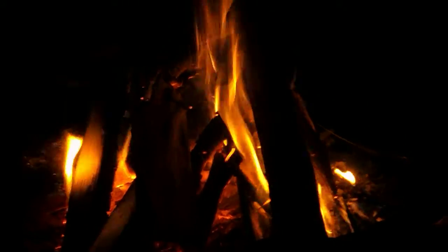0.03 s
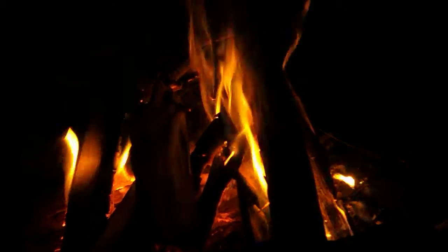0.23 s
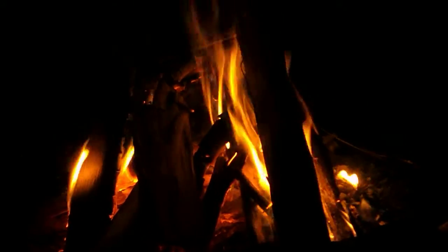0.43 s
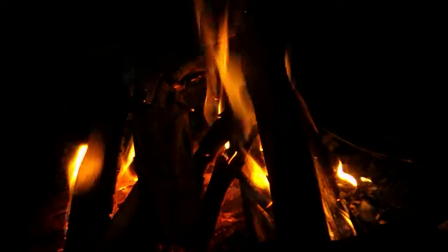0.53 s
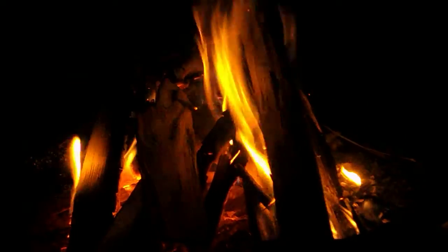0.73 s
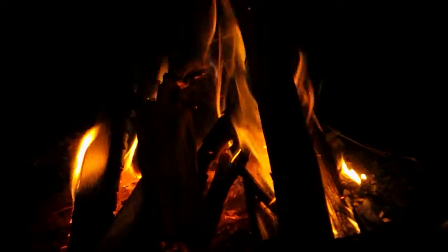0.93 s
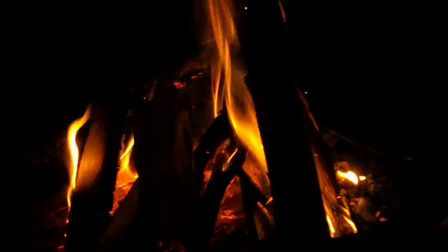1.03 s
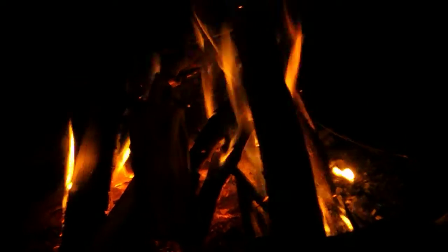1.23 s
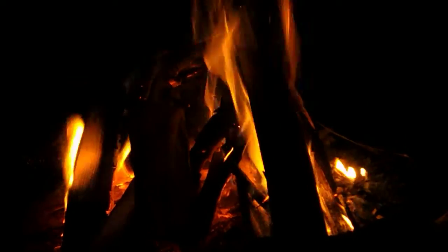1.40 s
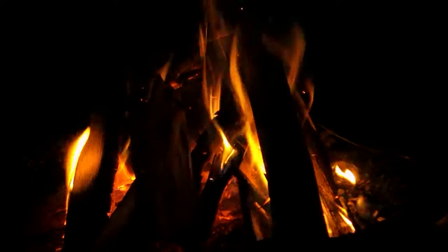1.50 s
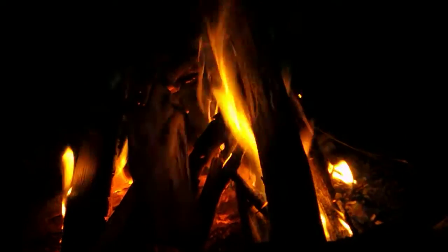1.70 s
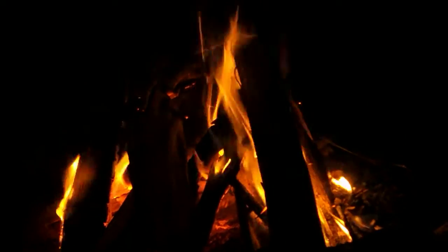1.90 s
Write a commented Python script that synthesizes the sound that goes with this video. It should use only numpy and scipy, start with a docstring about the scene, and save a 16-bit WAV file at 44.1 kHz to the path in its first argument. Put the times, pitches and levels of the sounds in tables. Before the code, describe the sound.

Wood fire crackling softly with one sharp snap, an owl hooting once far away.

```python
"""A campfire at night: from the start flames rush, steam hisses from the logs and embers tick
over a low, slowly beating hum. At 0.2 s a distant owl begins one long, wavering hoot that echoes
among the trees; just after, a log splits with a sharp snap. From 0.6 s sap whistles faintly, then
flaring gas puffs softly. The hoot ends in a tremolo by 1.4 s and the fire crackles on."""
import sys
import numpy as np
from scipy import signal
from scipy.fft import rfft, irfft
from scipy.io import wavfile
from scipy.ndimage import uniform_filter1d

SR = 44100
rng = np.random.default_rng(int(sys.argv[2]) if len(sys.argv) > 2 else 0)


def wrap_up_sound(samples):
    """Save the sound to the file named by the first command line argument, as 16-bit audio."""
    columns = np.atleast_2d(samples).T
    # keep every value between -1 and 1, then stretch to whole-number steps
    tamed = np.clip(columns, -1, 1)
    steps = np.round(tamed * 32767).astype(np.int16)
    wavfile.write(sys.argv[1], SR, steps)


N = 85995


def amp(db):
    """Decibels to gain."""
    return 10 ** (np.asarray(db) / 20)


def unit(x):
    """Scale to rms 1."""
    return x / np.sqrt(np.mean(x ** 2) + 1e-20)


def db_at(spectrum, hz):
    """Interpolate a spectrum on a log-frequency axis."""
    points_hz, db = np.transpose(spectrum)
    return np.interp(np.log(hz + 1), np.log(points_hz), db)


def add(mix, start_s, sound):
    """Mix a sound in at start_s."""
    part = mix[max(round(start_s * SR), 0):][:len(sound)]
    part += sound[:len(part)]


def drift(count, rate_hz):
    """Random wander below rate_hz, rms about 1."""
    hz = np.fft.rfftfreq(N, 1 / SR)
    lowpassed = rfft(rng.standard_normal(N)) / (1 + (hz / rate_hz) ** 4)
    return unit(irfft(lowpassed, N))[:count]


def click(colour, size=2048):
    """Minimum-phase click of energy 1; colour maps Hz to dB."""
    hz = abs(np.fft.fftfreq(size, 1 / SR))
    log_gain = np.log(amp(colour(hz)))
    spectrum = np.exp(np.conj(signal.hilbert(log_gain)))
    x = np.fft.ifft(spectrum).real[:size // 2]
    return x / np.linalg.norm(x)


def tail(t60_s):
    """Dense decaying reflections of energy 1."""
    t = np.arange(SR) / SR
    decay = np.exp(-np.log(1000) * t / t60_s)
    x = (rng.choice([-1., 1.], SR) * decay)[:int(t60_s * SR) + 2]
    return x / np.linalg.norm(x)


def noise(spectrum, patch_db, size=512):
    """Coloured noise of rms 1 with drifting patches of strength."""
    hz = np.fft.rfftfreq(size, 1 / SR)
    real, imag, patches = rng.standard_normal((3, len(hz), 4 * N // size + 5))
    patches = uniform_filter1d(patches, size=8, axis=0)
    patches = unit(uniform_filter1d(patches, size=10, axis=1))
    frames = (real + 1j * imag) * amp(db_at(spectrum, hz)[:, None] + patch_db * patches)
    _, x = signal.istft(frames, nperseg=size, noverlap=size - size // 4)
    return unit(x[:N])


# flame rush spectrum (frequency [Hz], relative density [dB])
RUSH_SPECTRUM = [(20, -12), (50, -4), (120, 0.5), (200, -1), (350, -4), (600, -4), (850, -5.5),
                 (1080, -4.5), (1400, -9), (2800, -12), (5000, -16), (12000, -39)]

def flames(level_db=-57):
    """The flames make a soft, steady rush."""
    return amp(level_db) * noise(RUSH_SPECTRUM, patch_db=1.5, size=2048)


# steam spectrum (frequency [Hz], relative density [dB])
HISS_SPECTRUM = [(1000, -21), (3000, -10), (4700, -2.5), (5150, 1.5), (5500, -2), (5900, 1), (6300, 0),
                 (7000, 3), (8300, 2), (10300, -3), (11000, -10.5), (12200, -25)]
# steam envelope (time [s], level [dB])
HISS_ENVELOPE = [(0, -55.5), (.2, -57), (.3, -55.5), (.45, -57), (.85, -56.5), (1.099, -55.5), (1.4, -56.5),
                 (1.52, -57), (1.95, -57.5)]

def steam():
    """Steam leaves the logs with a steady hiss."""
    level_db = np.interp(np.arange(N) / SR, *np.transpose(HISS_ENVELOPE))
    return amp(level_db) * noise(HISS_SPECTRUM, patch_db=0.9)


# beating pair (frequency [Hz], level [dB])
HUM_TONES = [(81.85, -62.7), (80.15, -62.7)]

def hum(lull_s=.36):
    """Two close low tones swell and cancel in turn."""
    t = np.arange(N) / SR - lull_s
    first, second = (amp(db) * np.sqrt(2) * np.sin(2 * np.pi * hz * t) for hz, db in HUM_TONES)
    return first - second


def tick(pitch_hz, width_oct, skirt_db=-23, ring_db=-13, low_hz=3800, top_hz=10400):
    """A tiny burst in the wood, coloured round one pitch, with a faint ring; energy 1."""
    def colour(hz):
        octaves = np.log2((hz + 1) / pitch_hz)
        peak_db = np.maximum(skirt_db, -4.3 * (octaves / width_oct) ** 2 / 2)
        rolloff_db = 10 * np.log10(1 + (low_hz / (hz + 100)) ** 4 + (hz / top_hz) ** 30)
        return peak_db - rolloff_db

    body = click(colour)
    out = np.zeros(2048)
    add(out, 0, np.convolve(body, tail(t60_s=.0035)))
    add(out, 0, amp(ring_db) * np.convolve(body, tail(t60_s=.02)))
    return out / np.linalg.norm(out)


def embers(rate_per_s=50, floor_db=-40.5, spread_db=3):
    """Embers patter: faint ticks of random time, level and pitch."""
    out = np.zeros(N)
    for when, size, pitch in rng.random((int(rate_per_s * N / SR), 3)):
        db = floor_db + spread_db * min(-np.log(1 - size), 3)  # capped exponential draw
        add(out, when * N / SR, amp(db) * tick(pitch_hz=5000 + 4500 * pitch, width_oct=.18))
    return out


# clear ticks (time [s], level [dB], pitch [Hz], width [oct])
CRACKLES = [(0.0707, -25, 7300, .35), (.1030, -24.5, 6750, 0.15), (.1380, -24.5, 7000, 0.38),
            (0.4622, -27, 6200, 0.22), (0.5122, -25, 7000, 0.16), (0.5354, -17.5, 5900, 0.18),
            (0.5347, -24.5, 10300, 0.09), (.692, -29, 6800, 0.2), (.786, -26.5, 7860, .3),
            (.865, -22.5, 6600, 0.19), (0.9053, -23, 8500, .25), (.9275, -26.5, 8700, .3),
            (1.298, -27, 7450, 0.15), (1.398, -28, 7470, .25), (1.4424, -29.5, 4600, .15),
            (1.913, -19, 9450, 0.066), (1.9139, -16, 7160, 0.059), (1.9148, -24, 5450, .1),
            (1.9203, -31, 7600, .3)]

def crackle():
    """Larger bursts in the wood stand out from the patter."""
    out = np.zeros(N)
    for start_s, db, pitch_hz, width_oct in CRACKLES:
        add(out, start_s, amp(db) * tick(pitch_hz, width_oct))
    return out


# hoot contour (time [s], pitch [Hz], relative level [dB])
HOOT_CONTOUR = [(.195, 650, -66), (.222, 712, -57), (.262, 765, -51.5), (.305, 785, -47.5),
                (0.357, 712, -54), (.41, 715, -56.5), (.468, 757, -52.5), (0.499, 685, -60),
                (0.533, 757, -49.5), (0.561, 752, -50.5), (0.591, 700, -57), (0.63, 717, -54.5),
                (0.684, 786, -48.5), (.765, 783, -50), (0.854, 768, -49.5), (.915, 738, -55.5),
                (0.974, 725, -54.5), (1.059, 718, -59), (1.15, 710, -56), (1.24, 706, -57.5),
                (1.328, 693.5, -59), (1.36, 670, -77)]
TREMOLO_START_S, TREMOLO_RISE_S, TREMOLO_CREST_S = .9, .048, 1.145
TREMOLO_RATE_HZ, TREMOLO_SWING_HZ, TREMOLO_SWING_DB = 11.98, 26, 3.5

def owl(gain_db=-.5, jitter=.0069):
    """A nearly pure tone; in the closing tremolo pitch and level swing together."""
    t = np.arange(N) / SR
    times_s, hz, db = np.transpose(HOOT_CONTOUR)
    depth = np.clip((t - TREMOLO_START_S) / TREMOLO_RISE_S, 0, 1)
    swing = depth * np.cos(2 * np.pi * TREMOLO_RATE_HZ * (t - TREMOLO_CREST_S))
    pitch_hz = uniform_filter1d(np.interp(t, times_s, hz), size=700) + TREMOLO_SWING_HZ * swing
    pitch_hz *= 1 + jitter * drift(N, rate_hz=78)
    level_db = gain_db + np.interp(t, times_s, db) + TREMOLO_SWING_DB * swing
    singing = (t > times_s[0]) & (t < times_s[-1])
    envelope = uniform_filter1d(amp(level_db) * singing, size=400)
    return envelope * np.sqrt(2) * np.sin(2 * np.pi * np.cumsum(pitch_hz) / SR)


def forest(call, echo_db=-10.5, delay_s=.03):
    """The direct call plus its reflections from the trees."""
    out = call.copy()
    add(out, delay_s, amp(echo_db) * signal.fftconvolve(call, tail(t60_s=1.7)))
    return out


# splits in the log (time [s], level [dB])
SPLITS = [(.2304, 1.5), (.23098, -0.5)]
# split spectrum (frequency [Hz], relative level [dB])
SPLIT_SPECTRUM = [(300, -56), (1400, -47), (2400, -26), (3700, -14.5), (4800, 0), (7200, 2.5), (8600, 1),
                  (9800, -14), (11500, -33)]
# log ring spectrum (frequency [Hz], relative level [dB])
RING_SPECTRUM = [(300, -52), (1500, -41), (2500, -14.5), (3100, -21), (4400, -2), (5300, -6), (6800, -3.5),
                 (8200, -9.5), (10000, -16), (12000, -35)]

def snap(ring_db=-5.5):
    """Wood splits with a double click, then the log rings briefly."""
    out = np.zeros(N)
    split = click(lambda hz: db_at(SPLIT_SPECTRUM, hz))
    for start_s, db in SPLITS:
        add(out, start_s, amp(db) * split)
    ring = np.convolve(click(lambda hz: db_at(RING_SPECTRUM, hz)), tail(t60_s=.023))
    add(out, SPLITS[-1][0], amp(ring_db) * ring)
    return out


# whistles (start [s], length [s], pitch [Hz], glide [Hz], level [dB])
SAP_WHISTLES = [(0.562, .09, 6940, -26, -66), (0.652, 0.077, 6640, -250, -66),
                (1.14, 0.094, 5210, 10, -62.5), (1.178, 0.11, 6980, -140, -63),
                (1.29, 0.18, 6820, -330, -68), (1.59, 0.11, 5200, -10, -65.5), (1.8, 0.148, 6450, 154, -64)]

def sap(jitter=.0031):
    """Sap whistles out of the wood in thin, unsteady glides."""
    out = np.zeros(N)
    for start_s, length_s, hz, glide_hz, db in SAP_WHISTLES:
        progress = np.linspace(0, 1, int(length_s * SR))
        pitch_hz = (hz + glide_hz * progress) * (1 + jitter * drift(len(progress), rate_hz=150))
        envelope = amp(db) * np.sqrt(2 * abs(np.sin(np.pi * progress)))
        add(out, start_s, envelope * np.sin(2 * np.pi * np.cumsum(pitch_hz) / SR))
    return out


# puffs of flame (centre time [s], level [dB])
FLAME_PUFFS = [(0.799, -57.5), (1.24, -55.5), (1.36, -58.5)]

def puffs(pitch_hz=166.6, width_hz=32, length_s=.0486):
    """Gas flares up in soft, low bursts of narrow-band noise."""
    out = np.zeros(N)
    t = np.arange(0, length_s, 1 / SR)
    for centre_s, db in FLAME_PUFFS:
        flutter = drift(len(t), width_hz) + 1j * drift(len(t), width_hz)
        gas = unit((flutter * np.exp(2j * np.pi * pitch_hz * t)).real)
        add(out, centre_s - length_s / 2, amp(db) * np.hanning(len(t)) * gas)
    return out


def scene():
    """Fire close by, owl far off; mono."""
    bed = flames() + steam() + hum() + embers()
    return (bed + crackle() + forest(owl()) + snap() + sap() + puffs())[None]


NOTCH_HZ, NOTCH_HALF_WIDTH_HZ, NOTCH_DB = 7650, 103, -11.5
BAND_LIMIT_HZ = 12250

def record(dry):
    """The microphone's narrow treble notch, then the band limit."""
    notch = click(lambda hz: NOTCH_DB / (1 + ((hz - NOTCH_HZ) / NOTCH_HALF_WIDTH_HZ) ** 2))
    notched = signal.oaconvolve(dry, notch[None])[:, :N]
    lowpass = signal.firwin(255, BAND_LIMIT_HZ, window=("kaiser", 9), fs=SR)
    return signal.oaconvolve(notched, lowpass[None], "same")


dry = scene()
out = record(dry)
wrap_up_sound(out)
```